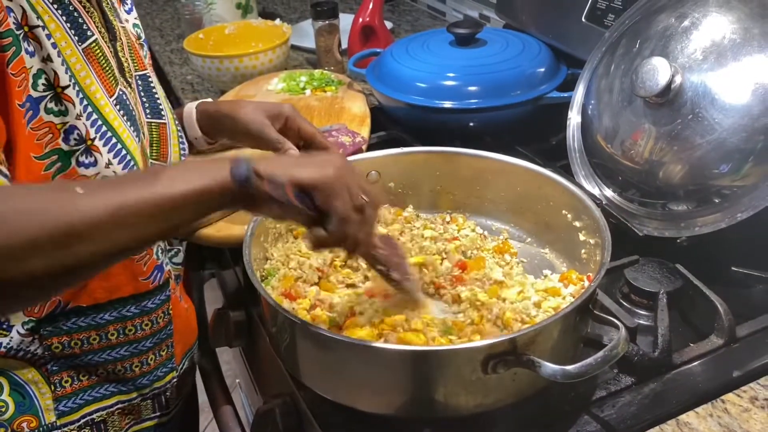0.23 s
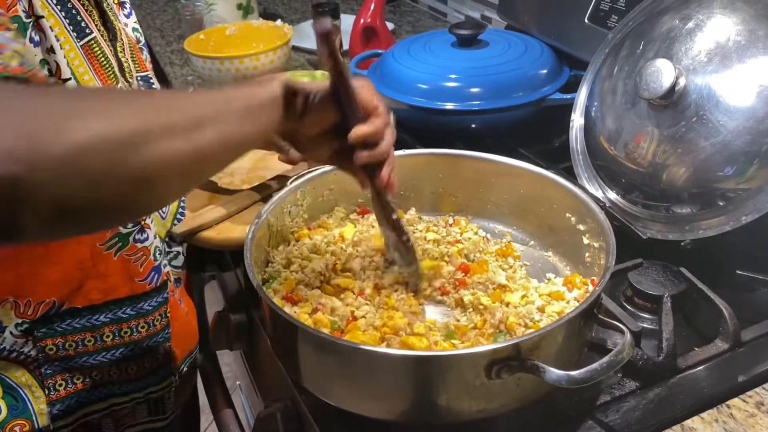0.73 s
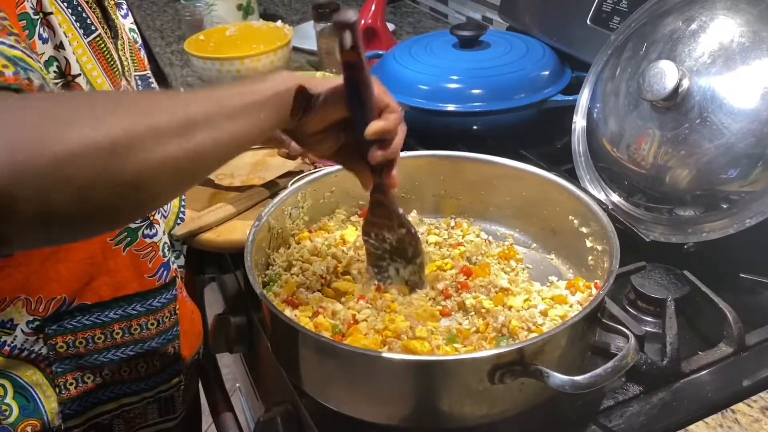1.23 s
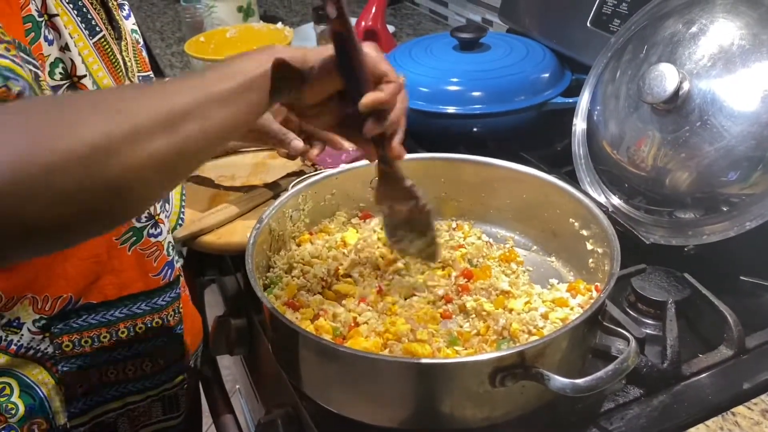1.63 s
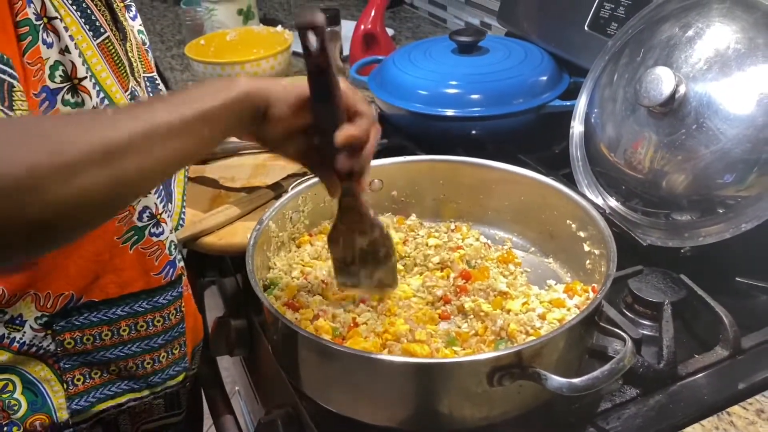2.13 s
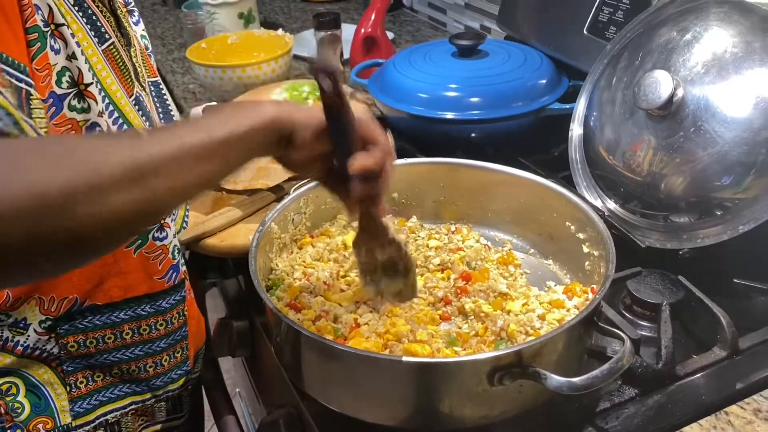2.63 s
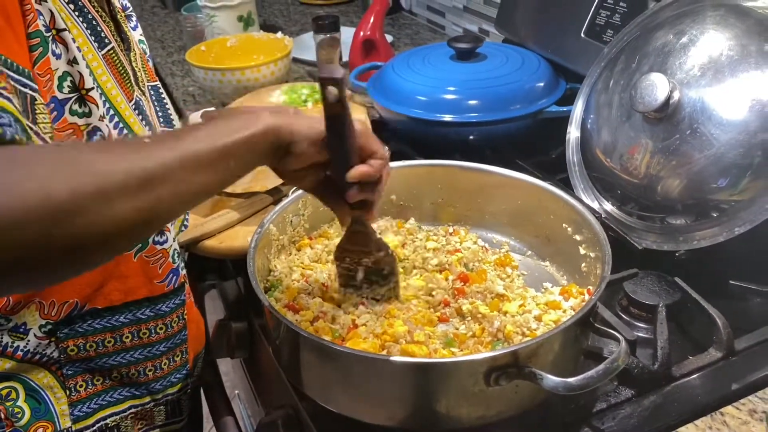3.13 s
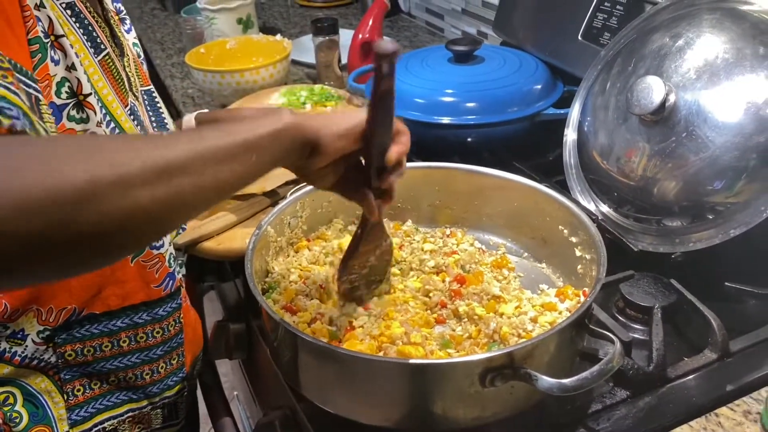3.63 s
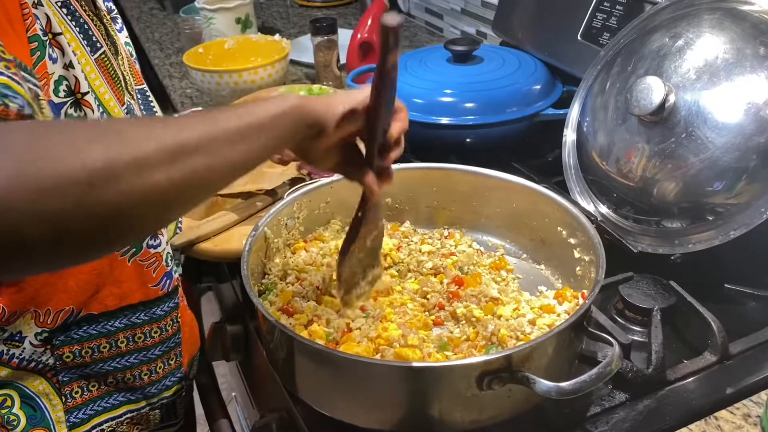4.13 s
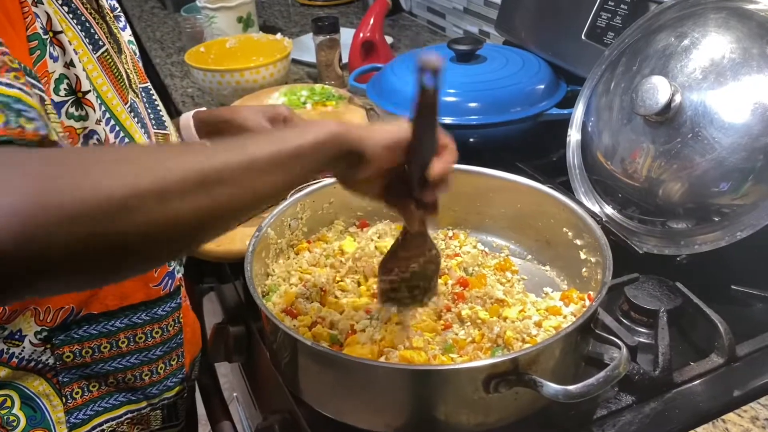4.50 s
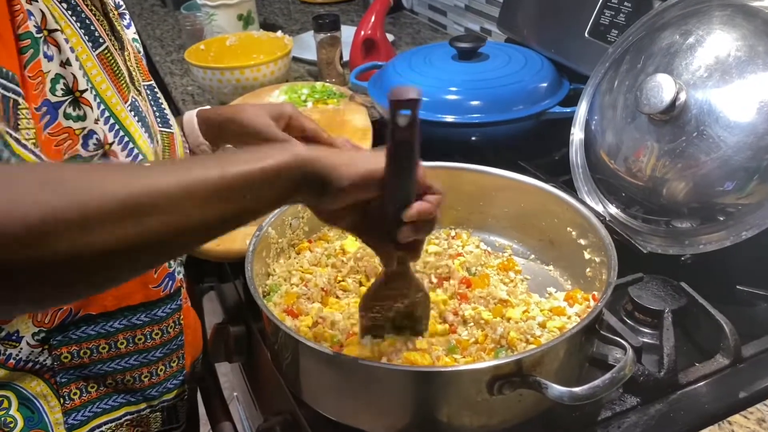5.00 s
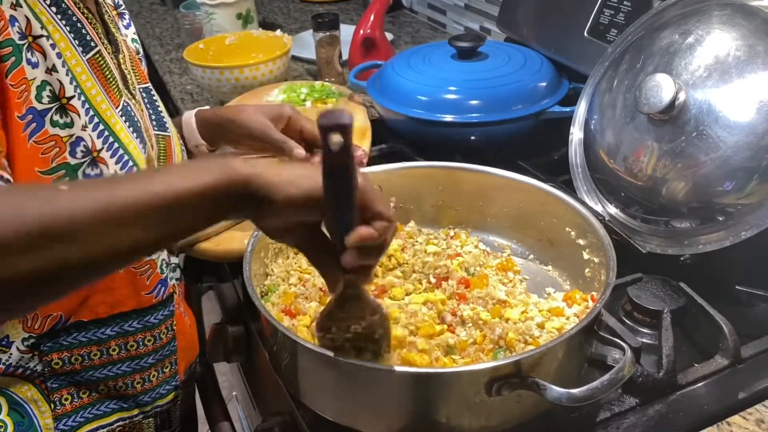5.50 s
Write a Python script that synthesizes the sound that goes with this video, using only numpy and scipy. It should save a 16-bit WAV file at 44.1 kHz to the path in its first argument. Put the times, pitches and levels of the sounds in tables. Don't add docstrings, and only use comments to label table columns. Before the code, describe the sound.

A wooden spatula knocks rhythmically on the base of a wide steel pot, crunching through rice over a soft sizzle and low extractor rumble.

```python
import sys
import numpy as np
from scipy import signal
from scipy.fft import rfft, irfft, next_fast_len
from scipy.io import wavfile
from scipy.ndimage import uniform_filter1d, map_coordinates

SR = 44100
rng = np.random.default_rng(int(sys.argv[2]) if len(sys.argv) > 2 else 0)


def inscribe(sig):
    pcm = np.round(np.clip(np.atleast_2d(sig).T, -1, 1) * 32767)
    wavfile.write(sys.argv[1], SR, pcm.astype(np.int16))


def gain_from_decibels(decibels):
    exponent = np.asarray(decibels, float) / 20
    return 10 ** exponent


N = 253696
USUAL_DB = -16

# (time [s], force [dB], blade over force [dB], hardness as rim over blade [dB],
# extra click [dB])
BLOWS = [(0.439, -38, -18, -1, 3), (0.6697, -13, -0.5, -10.5, 4), (0.94, -50, 8, -15, 8),
         (1.143, -14.5, 2, -5, 1), (1.4099, -16.5, 0.5, -7, -5), (1.657, -15, 0.5, -9.5, 4.5),
         (1.904, -37.5, -13, 2, 3), (2.139, -31.5, -1.5, -16, 5), (2.369, -32, -7, -7.5, 8),
         (2.604, -17.5, 1.5, -12, -1), (2.8335, -19, -0.5, -8, -5), (3.057, -15, 3, -6, -1),
         (3.296, -28, -.5, -19, 2), (3.514, -14.5, 3.5, -3.5, -1), (3.764, -21.5, 0.5, -7, -4),
         (3.985, -19, 2.5, -4.5, -7.5), (4.226, -16, 2.5, -10.5, 2), (4.4588, -13, 2.5, -8, 5.5),
         (4.667, -16.5, 1, -7.5, -2.5), (4.92, -28.5, 0, -14.5, 2), (5.167, -18, 5, -14.5, 8),
         (5.403, -19, 9.5, -6, -0.5), (5.648, -22, 12.5, -8, 3)]


def unit(x):
    return x / np.sqrt(np.mean(x ** 2) + 1e-20)


def along(points, hz):
    f, v = np.transpose(points)
    return np.interp(np.log(hz + 1), np.log(f + 1), v)


def filtered(x, response):
    m = next_fast_len(x.shape[-1] + 8192)
    spectrum = rfft(x, m) * response(np.fft.rfftfreq(m, 1 / SR))
    return irfft(spectrum, m)[..., :x.shape[-1]]


def ports(hz):
    # (frequency [Hz], phase [rad])
    left_lead = [(2000, -0.12), (3000, 1), (4400, 1), (6300, 0.61), (10050, -2 * np.pi),
                 (13900, -4 * np.pi), (15700, -5 * np.pi)]
    f, lead = np.transpose(left_lead)
    half_db = along([(2200, 1.6), (3000, 0.57), (5400, 1.5), (6500, 0.16)], hz)
    half = gain_from_decibels(half_db) * np.exp(0.5j * np.interp(hz, f, lead))
    return np.array([half, 1 / half])


def rush(spectrum, alike, patchy_db, spit_db):
    grain = gain_from_decibels(spit_db * unit(uniform_filter1d(rng.standard_normal(N), size=40)))
    z = signal.stft(grain * rng.standard_normal((2, N)), nperseg=512)[2]
    field = uniform_filter1d(rng.standard_normal(z.shape[1:]), size=8, axis=0)
    field = uniform_filter1d(field, size=10, axis=1)
    pair = signal.istft(z * gain_from_decibels(patchy_db * unit(field)), nperseg=512)[1][:, :N]

    def middle_and_side(hz):
        turn = np.arccos(np.clip(along(alike, hz), -1, 1)) / 2
        return gain_from_decibels(along(spectrum, hz)) * [np.cos(turn), np.sin(turn)]

    mid, side = filtered(pair, middle_and_side)
    return unit(np.array([mid + side, mid - side]))


def stove():
    # (frequency [Hz], density [dB per Hz])
    rumble_spectrum = [(13, -65), (22, -113), (43, -5.5), (95, -5), (153, -3), (206, -5.5), (242, -8.5),
                       (267, -6.5), (366, -13), (389, -13), (589, -15.5), (1050, -17.5), (2500, -26),
                       (3250, -42), (5500, -120)]
    # (frequency [Hz], likeness [0-1])
    rumble_alike = [(60, .98), (130, 0.99), (290, 0.83), (640, 0.23), (2500, 0.32)]
    # (frequency [Hz], density [dB per Hz])
    sizzle_spectrum = [(1200, -9), (2200, -1.5), (3500, 1), (5500, -1), (6300, -3.5), (8500, -3),
                       (10300, -1.5), (12500, -4.5), (15200, -1.5)]
    # (frequency [Hz], likeness [0-1])
    sizzle_alike = [(2000, 0.66), (5000, 0.8), (6000, 0.42), (7500, 0.23), (8500, 0.85), (15000, 1)]
    # (time [s], level [dB])
    frying = [
        (0, -52.3),
        (.4, -53.5),
        (1.1, -53.5),
        (2.2, -54.5),
        (3.5, -55),
        (4.3, -54.5),
        (5.75, -55),
    ]
    t = np.arange(N) / SR
    flutter = map_coordinates(rng.standard_normal(400), [t * 45])
    sway = map_coordinates(rng.standard_normal(40), [t * 3])
    rumble_db = -41.5 + 0.2 * sway
    rumble = gain_from_decibels(rumble_db) * rush(rumble_spectrum, rumble_alike, patchy_db=1.0, spit_db=-2.0)
    sizzle_db = np.interp(t, *np.transpose(frying)) + 7.0 + 0.78 * flutter
    sizzle = gain_from_decibels(sizzle_db) * rush(sizzle_spectrum, sizzle_alike, patchy_db=1.1, spit_db=0.2)
    return rumble + filtered(sizzle, ports)


def spits():
    # (time [s], peak [dB], top share [dB], t60 [s])
    fat_spits = [
        (1.904, -40.5, -14, 0.036),
        (2.835, -34, -2, 0.016),
        (3.291, -42, -10, 0.036),
        (4.459, -44, -9, 0.064),
        (4.6666, -55, 4, 0.033),
    ]
    lag_s, scrape_top_db, scrape_t60_s = 0.001268, -10.5, 0.05
    scrapes = []
    for s, force_db, *_ in BLOWS:
        scrape_db = -40 + 0.2 * (force_db - USUAL_DB)
        scrapes.append((s + lag_s, scrape_db, scrape_top_db, scrape_t60_s))
    out, t = np.zeros(N + SR), np.arange(SR // 10) / SR
    for s, db, top_db, t60 in scrapes + fat_spits:
        envelope = gain_from_decibels(db + 9.0 - 60 * t / t60) * (1 - np.exp(-t / 0.00072))
        colour = [(2500, -5), (4500, -2), (7000, -10.0), (11000, top_db)]
        tick = filtered(envelope * rng.standard_normal(len(t)), lambda hz: gain_from_decibels(along(colour, hz)))
        out[round(s * SR):][:len(t)] += tick
    return filtered(out[:N], ports)


def kitchen(x, walls):
    # (frequency [Hz], t60 [s])
    room_decay = [(150, 0.16), (400, 0.62), (1040, 0.61), (1800, 0.51), (2760, 0.19), (8000, 0.23)]
    # (frequency [Hz], level [dB])
    room_level = [(150, -2), (270, -9.5), (400, -3.5), (550, -3.5), (800, -6), (1050, -4), (1300, -15),
                  (1700, -3.5), (2500, -4.5), (5000, 4)]
    hz, t, z = signal.stft(walls + rng.standard_normal(walls.shape), SR, nperseg=512)
    share = along([(150, 1.0), (500, 0.29), (1500, 0.027)], hz)[:, None]
    z[1] = share * z[0] + np.sqrt(1 - share ** 2) * z[1]
    z = z * gain_from_decibels(-60 * t / along(room_decay, hz)[:, None])
    energy = uniform_filter1d(np.sum(np.abs(z) ** 2, -1), size=3, axis=1)
    z = z * (gain_from_decibels(along(room_level, hz)) / np.sqrt(energy))[..., None]
    tail = signal.istft(z, SR, nperseg=512)[1][:, :len(x)] / 16
    age = np.arange(len(x)) / SR
    tail = tail * (1 - np.exp(-(age / 0.007) ** 2))
    tail = tail * (1 + 0.8 * np.exp(-age / 0.012))
    return signal.fftconvolve(x[None], tail, axes=1)[:, :len(x)]


def bounced(x, share):
    # (delay [s], share left [ratio], share right [ratio])
    returns = [
        (.00295, 1.05, .75),
        (.0059, .3, .3),
    ]

    def comb(hz):
        echoes = sum(np.array([[left], [right]]) * np.exp(-2j * np.pi * hz * delay)
                     for delay, left, right in returns)
        return 1 + share * echoes

    return filtered(x, comb)


def ring(modes, t):
    hz, db, crest, right_db, lead = np.transpose(modes)[:, :, None]
    level_db, detune, balance_db = rng.standard_normal((3, len(modes), 1)) * [[[1.2]], [[0.006]], [[1.5]]]
    size = gain_from_decibels(db + level_db) * (t / crest * np.exp(1 - t / crest)) ** 3
    phase = 2 * np.pi * hz * (1 + detune) * t
    left = np.sum(size * np.sin(phase), 0)
    right = np.sum(gain_from_decibels(right_db + balance_db) * size * np.sin(phase + lead), 0)
    return -np.array([left, right])


def spatula():
    # (frequency [Hz], level [dB], time of crest [s], right minus left [dB], right phase lead [rad])
    blade_modes = [(875, 3.5, 0.0035, -5.5, 0.13), (994.6, 1, 0.0032, -4, 0.65),
                   (1015, -20, 0.0028, -0.5, 0.66)]
    wall_blade_modes = [(877, 1.1, 0.0038, -1.6, 0.14), (1092, 8.3, 0.0022, -1.2, 0.74)]
    thud_modes = [(150.2, -3.5, 0.016, 0.65, 0.055), (291.4, 8, 0.0097, 1, 0.033),
                  (347, 2, 0.011, 1.4, 0.14), (455, -4.5, 0.0092, 6, 0.24)]
    wall_thud_modes = [(166, 4, 0.0097, 1.3, 0.036), (275, 8.5, 0.014, 2.6, 0.072),
                       (334, -1, 0.021, 1.5, .1), (426, -1, 0.017, 3.2, 0.24)]
    base_modes = [(562.3, 4.5, 0.0041, -9, 1), (648.2, 6.5, 0.0024, -3.5, 0.21),
                  (780.6, -1.5, 0.0033, 8.5, 0.63)]
    rim_modes = [(1289, 8.1, 0.0028, 1.5, 0.77), (1432, 5.75, 0.0033, 0.5, 1)]
    click_modes = [(1776, -9, 0.013, 4, 0.33), (1896, -8, 0.0042, 11.5, 0.48), (2340, 4, 0.0012, 1.5, 0.92),
                   (2857, 0, 0.0023, -7, 0.22), (3457, -1, 0.0011, -5, .3), (4470, -6, 0.00065, -18, 0.27)]
    crunch_colour = [(1300, -28), (1900, 14.0), (4000, -6.0), (6500, -11.0), (8500, -37)]
    out, t = np.zeros((2, N + SR)), np.arange(SR // 2) / SR
    walls = rng.standard_normal((2, len(t)))
    for s, force_db, blade_db, hard_db, extra_db in BLOWS:
        near_wall = s > 5.1
        rim_db = force_db + blade_db + hard_db
        click_db = extra_db - 35 + 0.93 * (rim_db + 19.5)
        thud_db = -29.5 + 0.51 * (force_db - USUAL_DB)
        blade = gain_from_decibels(force_db + blade_db - 1.5) * ring(wall_blade_modes if near_wall else blade_modes, t)
        thud = gain_from_decibels(thud_db - 2.0) * ring(wall_thud_modes if near_wall else thud_modes, t)
        base = gain_from_decibels(force_db - 3) * ring(base_modes, t)
        click = gain_from_decibels(click_db - 3) * ring(click_modes, t)
        rim = gain_from_decibels(rim_db - 2) * ring(rim_modes, t)
        grains = gain_from_decibels(-60 * t / 0.031) * (1 - np.exp(-t / 0.00092)) * rng.standard_normal((2, len(t)))
        crunch = gain_from_decibels(click_db + 7) * filtered(grains, lambda hz: gain_from_decibels(along(crunch_colour, hz)))
        pot = base + click + crunch
        beam_db = -6 if near_wall else 0
        into_room = thud * gain_from_decibels(-2.5) + pot + rim + gain_from_decibels(beam_db) * blade
        answer = kitchen(into_room.mean(0), walls)
        direct = thud + bounced(rim, share=0.39) + bounced(blade + pot, share=0.15 if near_wall else 0.99)
        start = round((s + 0.0015) * SR)
        out[:, start:][:, :len(t)] += direct + gain_from_decibels(-19.5) * answer
    return out[:, :N]


def scene():
    return stove() + spits() + spatula()


def roll_off(x):
    return signal.sosfilt(signal.butter(12, 15660, fs=SR, output="sos"), x)


def record(dry):
    end_s, fade_s = 5.735, 0.02
    fade = np.clip((end_s - np.arange(N) / SR) / fade_s + 0.5, 0, 1) ** 2
    return roll_off(dry * fade)


dry = scene()
out = record(dry)
inscribe(out)
```